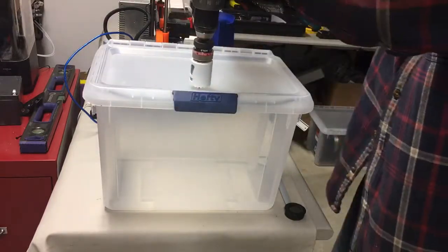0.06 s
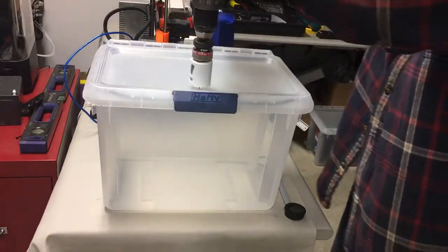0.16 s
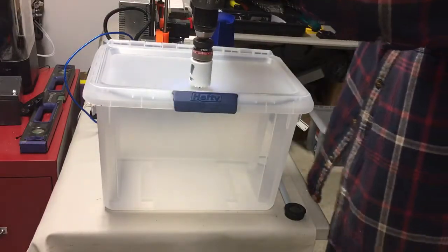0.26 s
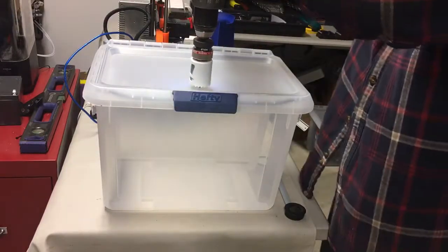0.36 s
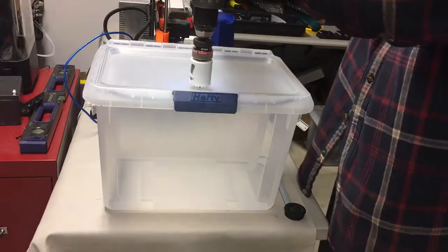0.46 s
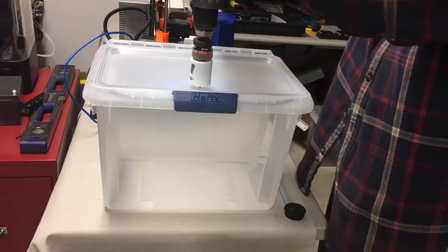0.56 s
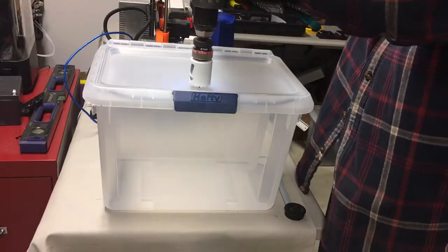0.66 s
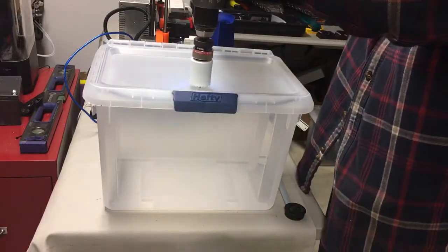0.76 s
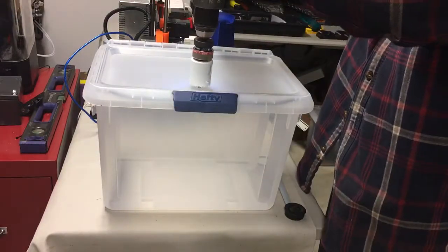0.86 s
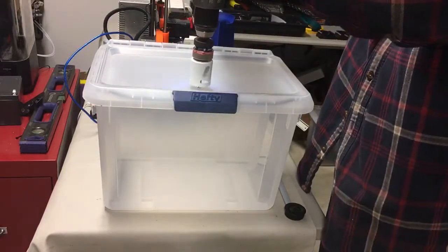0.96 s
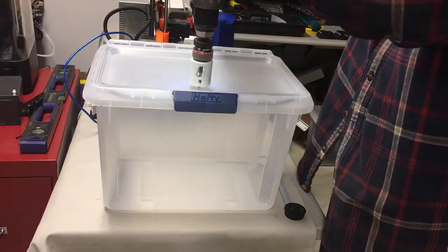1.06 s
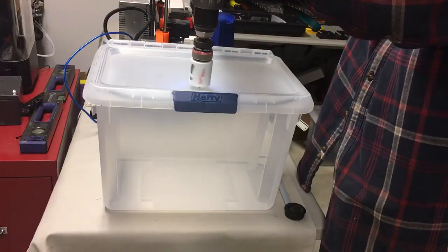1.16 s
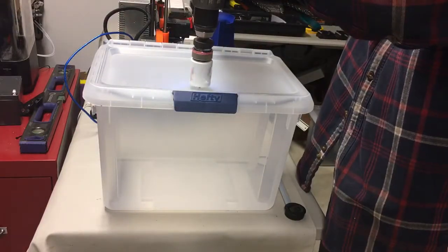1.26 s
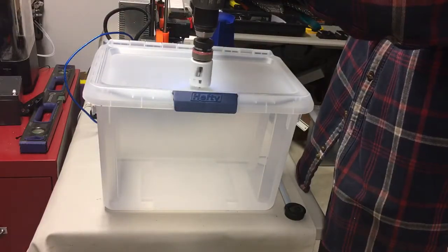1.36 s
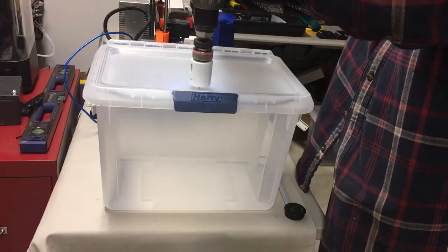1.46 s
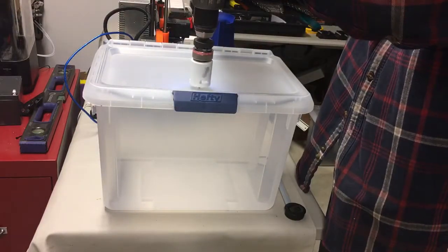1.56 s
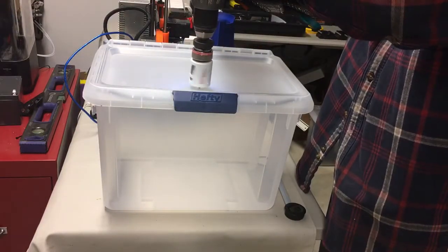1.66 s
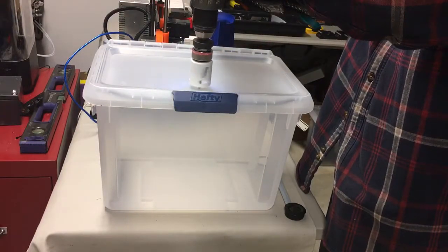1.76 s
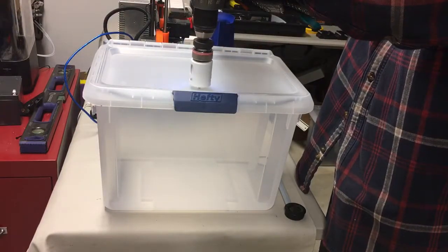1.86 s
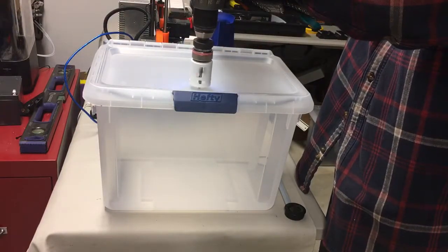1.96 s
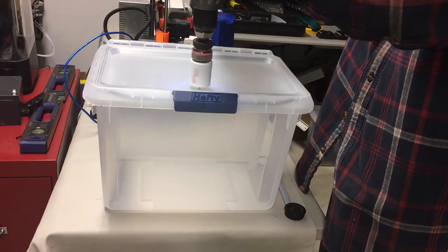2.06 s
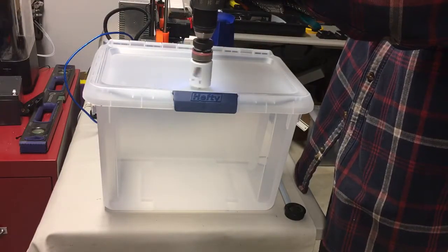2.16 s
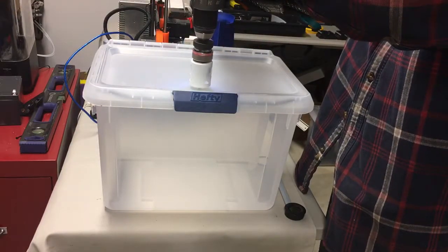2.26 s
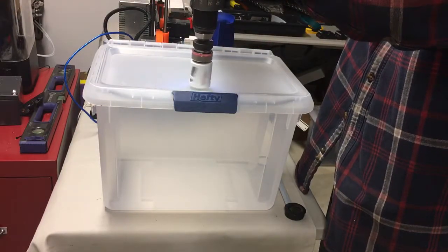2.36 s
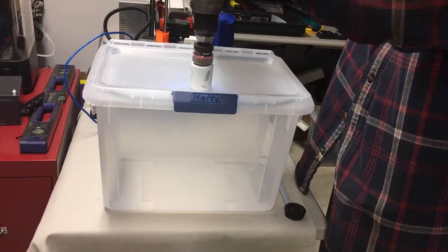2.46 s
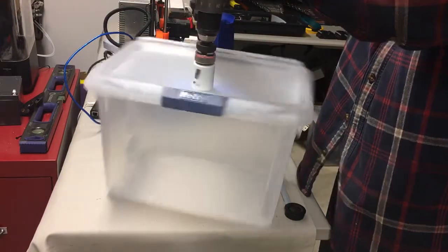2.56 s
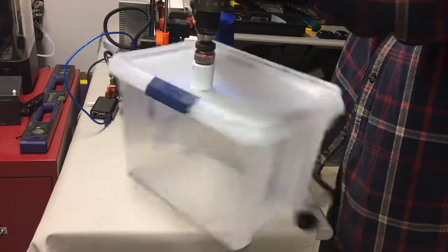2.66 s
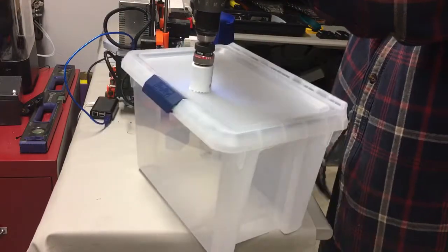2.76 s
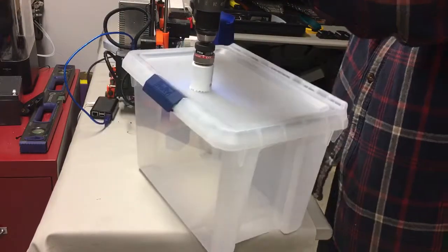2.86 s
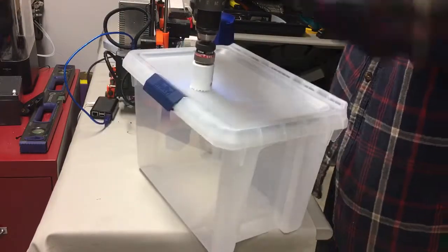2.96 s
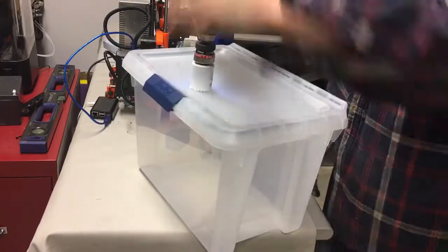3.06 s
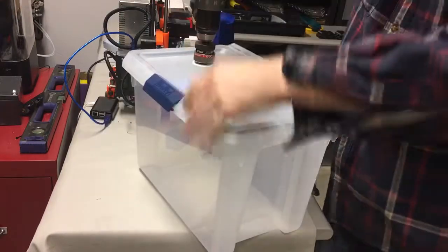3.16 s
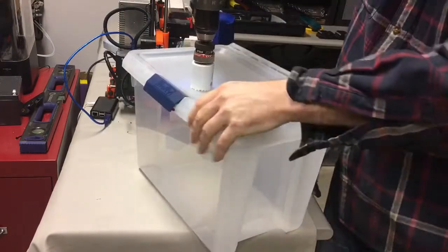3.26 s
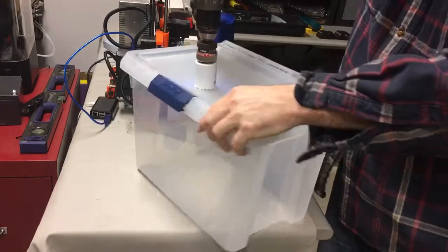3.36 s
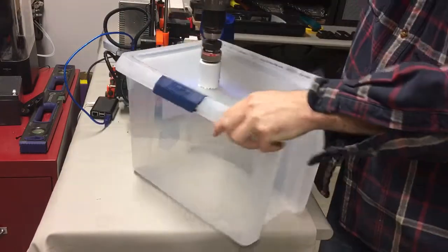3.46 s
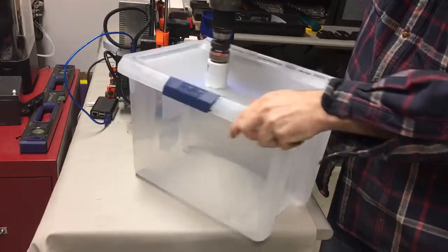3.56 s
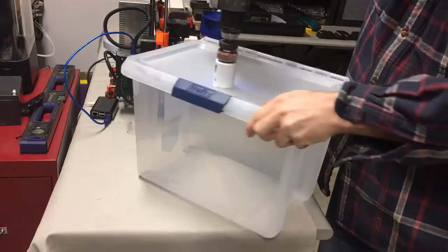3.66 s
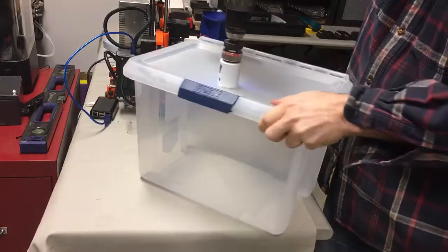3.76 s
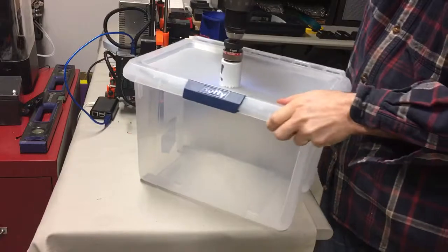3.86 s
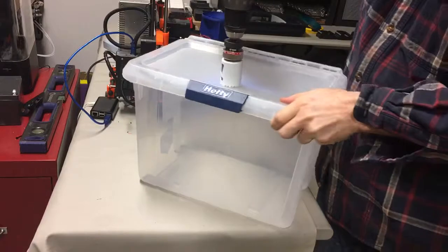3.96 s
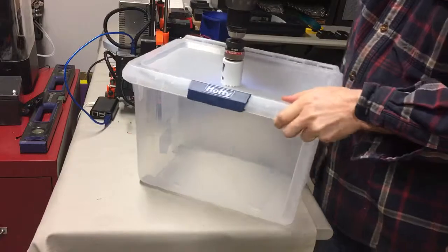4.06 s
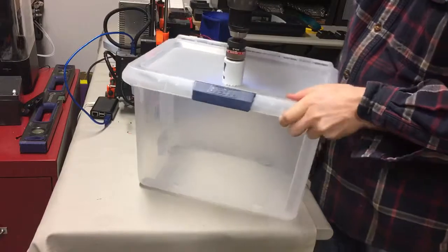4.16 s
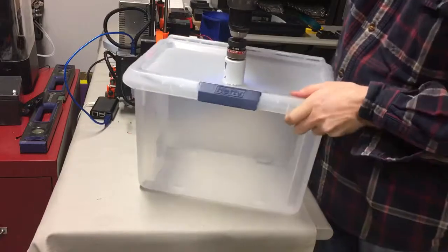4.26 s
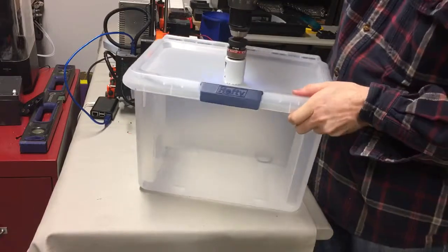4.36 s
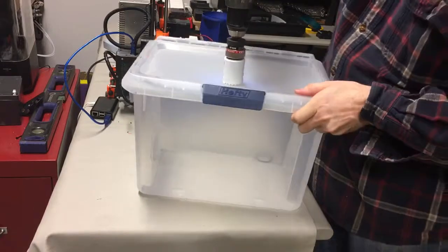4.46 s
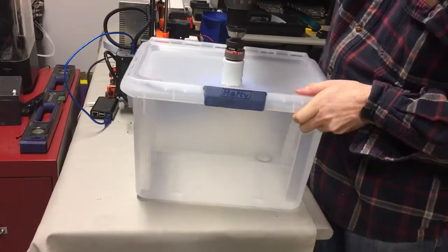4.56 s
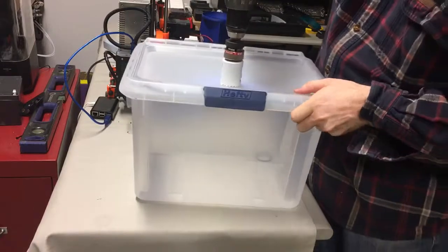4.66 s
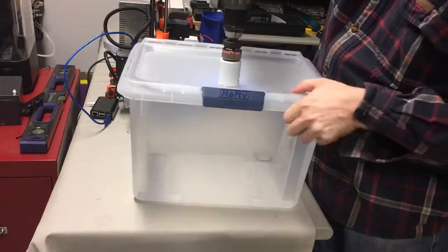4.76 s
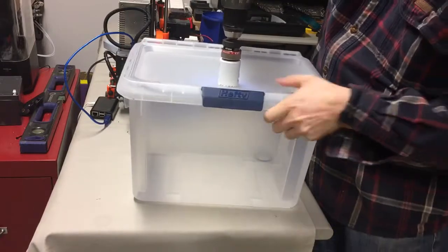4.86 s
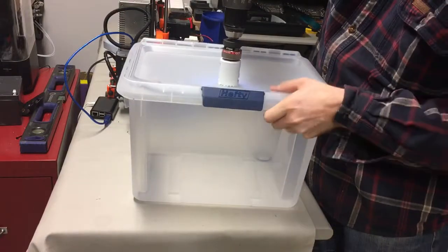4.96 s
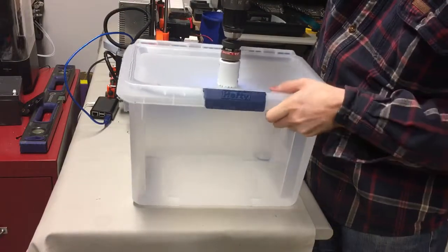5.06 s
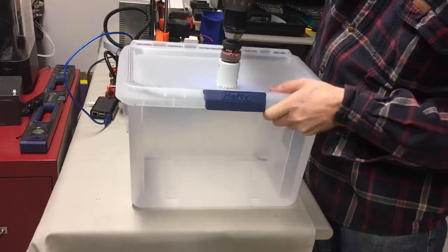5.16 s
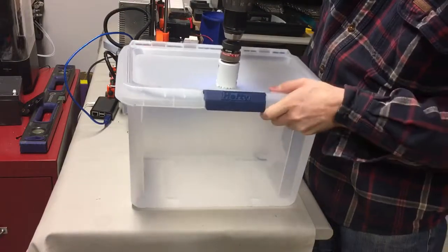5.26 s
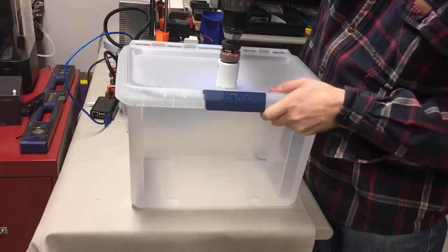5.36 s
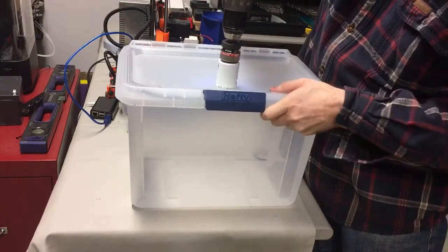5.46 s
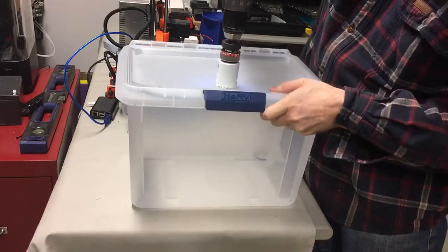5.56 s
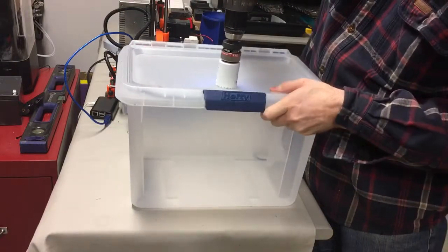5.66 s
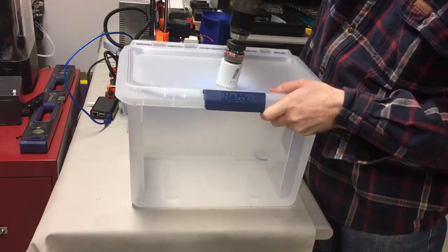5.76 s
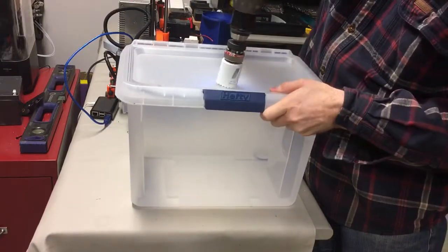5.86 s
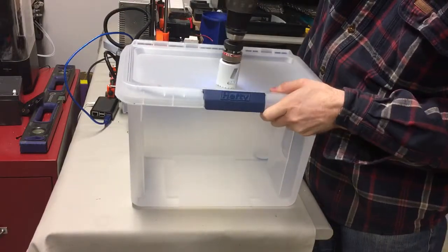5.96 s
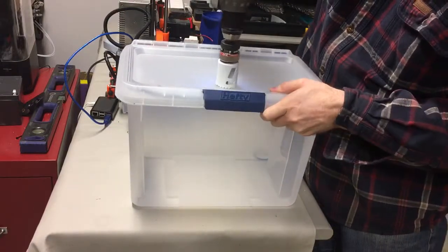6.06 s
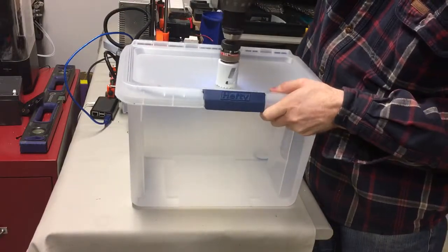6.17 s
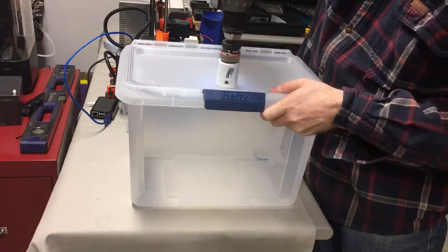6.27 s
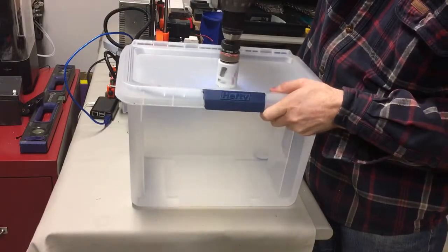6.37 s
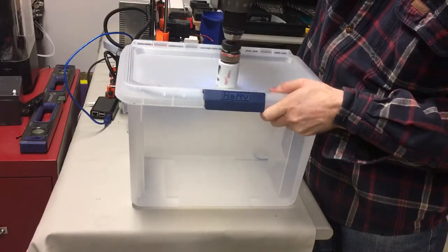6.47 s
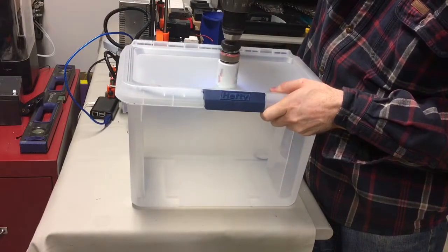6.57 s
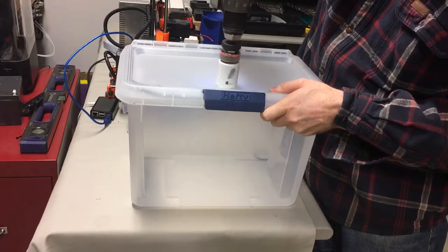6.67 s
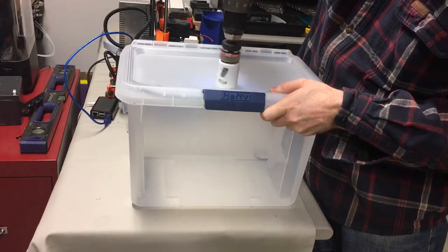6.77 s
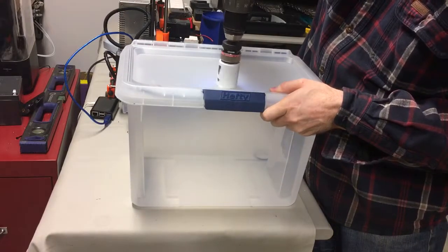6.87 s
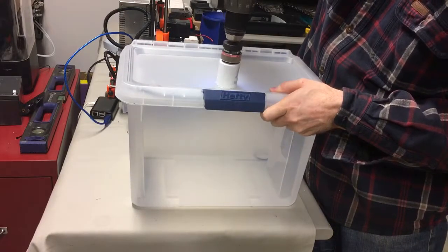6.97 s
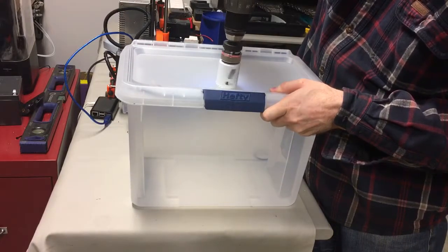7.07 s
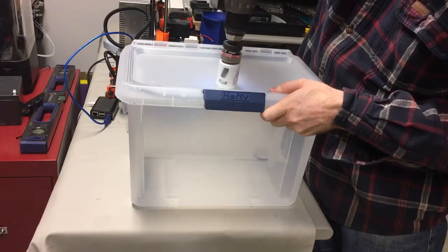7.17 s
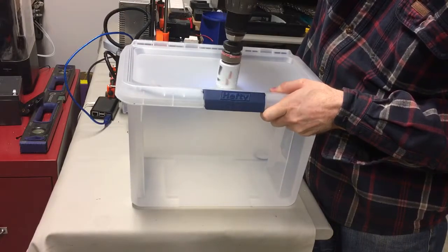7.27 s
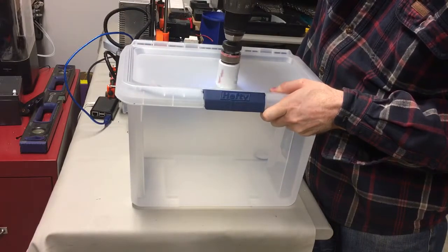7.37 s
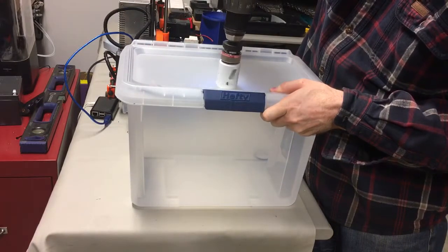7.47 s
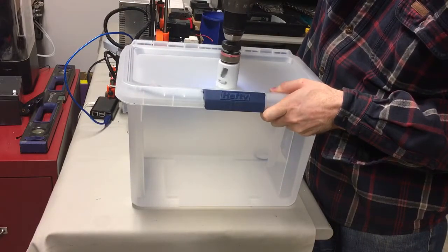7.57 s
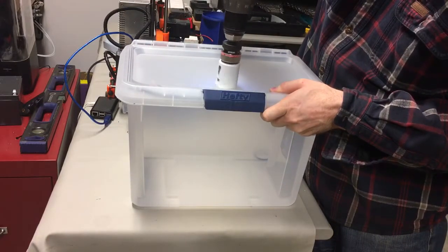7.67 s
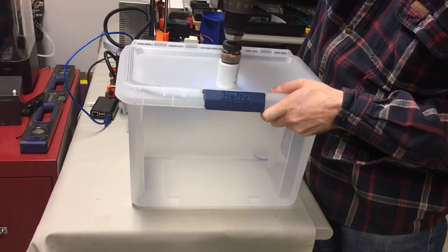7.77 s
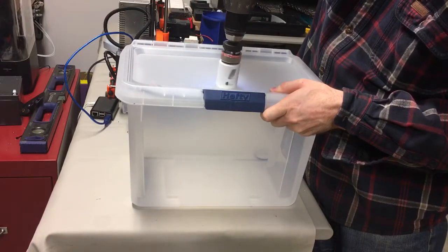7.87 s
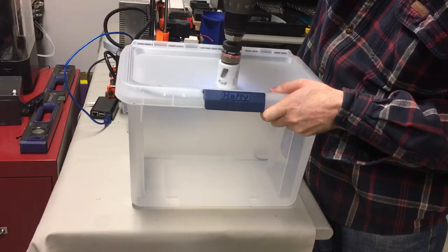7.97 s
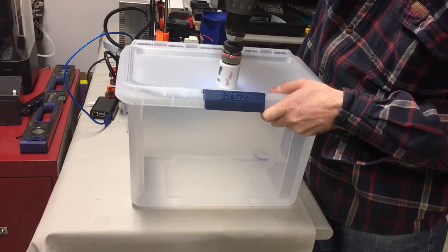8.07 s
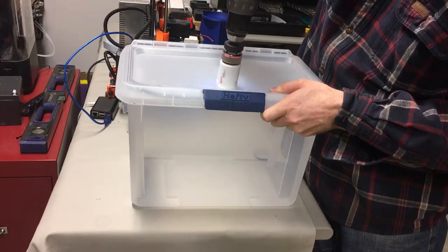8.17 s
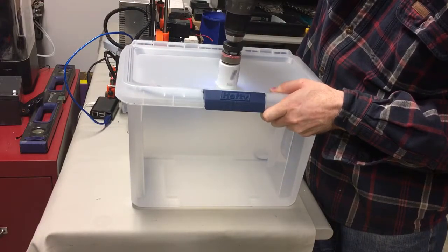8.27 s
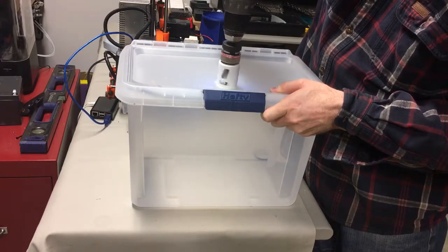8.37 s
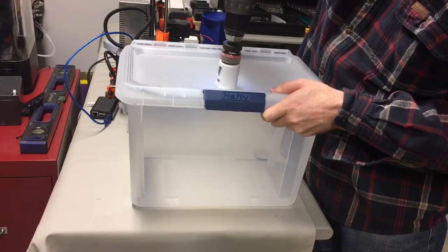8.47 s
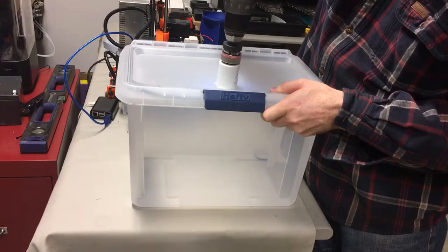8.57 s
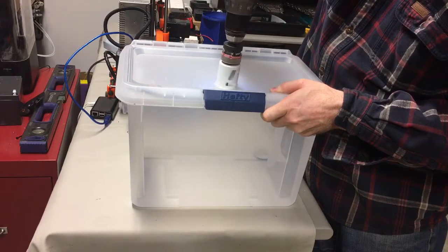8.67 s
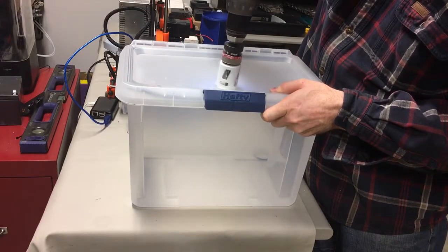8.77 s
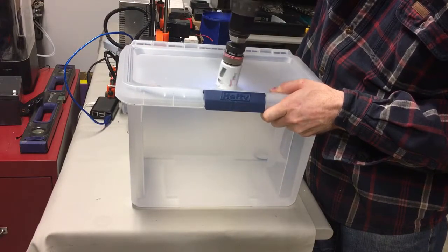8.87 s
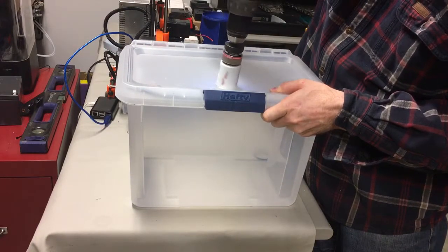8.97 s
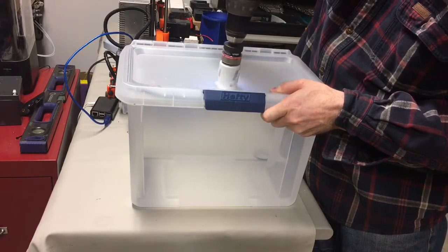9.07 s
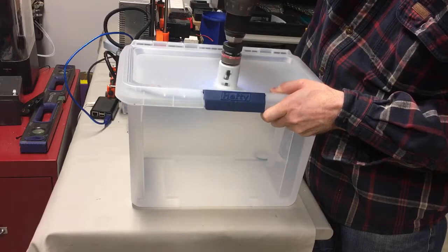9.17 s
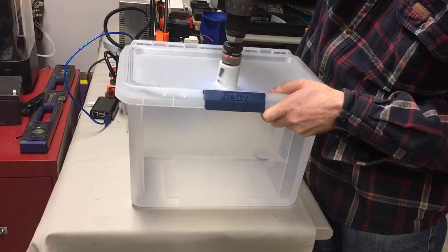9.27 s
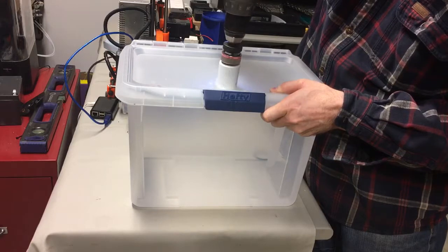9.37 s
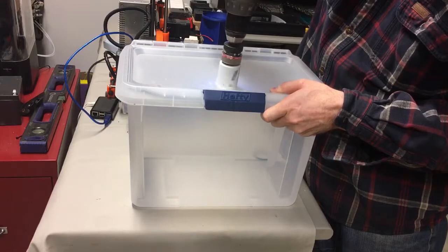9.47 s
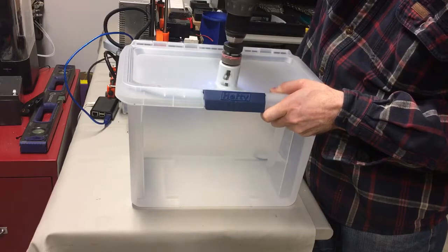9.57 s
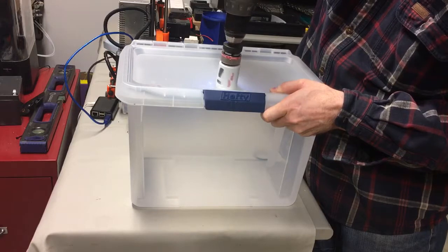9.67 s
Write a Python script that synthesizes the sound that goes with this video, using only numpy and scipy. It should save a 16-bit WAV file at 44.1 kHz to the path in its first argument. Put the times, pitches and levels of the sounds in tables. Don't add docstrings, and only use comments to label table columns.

```python
import sys
import numpy as np
from scipy import signal
from scipy.fft import rfft, irfft, next_fast_len
from scipy.io import wavfile
from scipy.ndimage import map_coordinates

SR = 44100
rng = np.random.default_rng(int(sys.argv[2]) if len(sys.argv) > 2 else 0)


def volts(x):
    e = np.asarray(x, float) / 20
    return 10 ** e


def bounce(signal):
    frames = np.transpose(np.atleast_2d(signal))
    limited = np.clip(frames, -1, 1)
    pcm = np.round(limited * 32767).astype(np.int16)
    wavfile.write(sys.argv[1], SR, pcm)


N = 429093
STEP = 32

# freq_hz [Hz], density_db [dB per Hz]
FLOOR_SPECTRUM = [(18, -48.5), (30, -3), (79, -4.5), (103, -17.5), (145, -11), (170, -34), (461, -47),
                  (10500, -47), (14400, -46), (16000, -58)]
# freq_hz [Hz], t60_s [s]
SHOP_DECAY = [(150, 1), (1000, 0.47), (4000, 0.57), (9000, 0.42), (15000, 0.16)]
# freq_hz [Hz], density_db [dB per Hz]
CLOTH = [(1060, -13), (1800, 0.5), (3380, 2.5), (4880, -4), (5490, -0.5), (6020, -2), (13200, -14.5),
         (16000, -21.5)]
GEARS = [(1060, -53), (1800, -18.5), (2350, -11.5), (2690, 5.5), (2920, 2.5), (4920, -7), (5960, 6),
         (7160, -7.5), (10600, -10.5), (11300, -14.5), (16000, -24)]
SAW = [(1060, -38), (1800, -28), (2720, 4.5), (4880, -4), (6240, 1), (7490, -9.5), (9080, -7), (9860, -9.5),
       (10500, -15.5), (12200, -12), (16000, -23)]
DULL = [(1060, -30), (1800, 0.5), (5250, -2), (7630, -12), (9770, -14), (16000, -34)]
# freq_hz [Hz], density_db [dB per Hz]
TEETH = [(240, -10), (400, -6), (800, -0.5), (950, -1.5), (1030, 5), (1120, 3), (1300, 2.5), (1900, 1),
         (2600, -2), (3400, -6), (5700, -120)]
WALLS = [(240, -46), (400, -18), (569, -2.5), (754, -9.5), (1240, -6.5), (1870, -15.5), (2600, -18),
         (3380, -40), (5720, -120)]
# centre_hz [Hz], width_hz [Hz], level_db [dB]
LID = [(129.7, 36, -6), (163.5, 10.7, 1.5), (196, 11.3, 2), (255, 16.3, 4.5), (341.3, 29, -0.5),
       (445.6, 77, -8)]
# peak_s [s], level_db [dB], fall_s [s per 10 dB], scrape_db [dB], drumming_db [dB]
JOLTS = [
    (0.0, -60, .05, -12, -2.2),
    (.13, -60, .11, -16, -12),
    (.2, -77, .7, -3, 4),
    (3.918, -48.5, .15, 6, -12),
    (3.914, -62, .055, 3, 32),
]
# peak_s [s], level_db [dB], fall_s [s per 10 dB], scrape_db [dB], drumming_db [dB]
STROKES = [(3.76, -54, .2, -3, -12), (3.55, -72, .06, 1.5, 20), (3.86, -60, .04, -10, -3),
           (4.285, -50, .115, -9, -2.5), (4.55, -49.5, .125, -8, .5), (4.7, -62, .08, -2.5, -6),
           (4.82, -63, .09, 7, 3), (4.975, -72, .055, 12, 22), (5.155, -54, .1, -11, .5),
           (5.3, -64, .06, 1.5, 7), (5.47, -78, .3, 3, 8)]
# start_s [s], peak_db [dB], bright_db [dB], boom_db [dB]
KNOCKS = [(2.658, -18, -15, -19), (2.744, -11.5, -1, -19), (3.157, -22, -30, -12), (3.848, -43, -11, -20),
          (3.907, -16, -17, -6), (4.511, -42, 11, -15), (4.795, -37.5, -29, -4), (4.83, -37, -19, -2.5),
          (4.923, -56, -23, -1), (4.943, -46, -21, 12.5), (4.97, -39.5, -24, 6), (5.029, -49, -20, -16),
          (5.482, -51.5, -5, -9)]
# start_s [s], peak_db [dB], low_db [dB]
TICKS = [
    (5.9344, -43.5, -9),
    (6.0194, -53, 11),
    (6.0721, -33.5, -5),
    (6.103, -38.5, 2),
    (6.1414, -49, -11),
]
# start_s [s], peak_db [dB], low_db [dB], ring_db [dB]
BOUNCES = [(3.156, -7.5, 9, -20), (3.1727, 15, -19, -2.5), (3.1776, 0, -30, -4), (3.188, -7.5, -28.5, -24),
           (3.2119, -2, -2.5, -9.5), (3.2996, -12, -18, -8.5), (3.3208, -15, -5.5, -10.5),
           (3.364, -4, -8.5, -5), (3.3861, -17, -2, -16), (3.4842, -3, -10, -6.5), (3.5632, -9.5, -17, -2),
           (3.5906, -32, -22, -7)]
# centre_hz [Hz], width_hz [Hz], level_db [dB]
STEEL = [(1230, 180, -18), (2450, 80, 14), (3130, 330, -5), (4300, 127, -23), (5600, 150, -.5),
         (8430, 490, -3), (9540, 330, -10.5), (13000, 900, -3.5)]
# centre_hz [Hz], width_hz [Hz], level_db [dB]
RIM = [(1740, 990, -12), (3090, 440, 1.5), (7500, 1820, -2), (9630, 300, -3), (13100, 590, 3.5)]
TIPS_AT_S = 3.25
# peak_s [s], level_db [dB], rise_s [s per 10 dB], fall_s [s per 10 dB]
ROLL = [
    (3.322, -31.5, .06, .17),
    (3.422, -31.5, .08, .1),
    (3.2, -44, .025, .28),
]
# on_s [s], off_s [s], upper_db [dB], lower_db [dB] of the switching lines, hum_db [dB]
RUNS = [
    (.697, 2.665, -43, -43, -57.5),
    (5.703, 5.862, -40.5, -38.5, -59),
    (6.252, 9.9, -41.5, -41.5, -55.5),
]
# start_s [s], gained_hz [commutation Hz], lag_s [s]
SQUEEZES = [
    (.698, 179.7, .018),
    (1.087, 200.8, .036),
    (1.611, 196.5, .046),
    (2.53, -90, .009),
    (5.69, 372.7, .016),
    (6.235, 121, .025),
    (6.347, 139.2, .013),
]
# centre_s [s], lost_hz [commutation
# Hz], width_s [s]
SAGS = [(2.24, 9.3, .059), (2.93, 46, .438), (5.875, 48, .042), (6.68, 6, .12), (7.356, 19.1, .248),
        (7.556, 7.5, .047), (7.896, 22.2, .16), (8.233, 41.4, .134), (8.909, 53, .148),
        (9.111, 19.7, .146), (9.323, 14, .086), (9.602, 16.9, .197)]
# whirr_db [dB], scrape_db [dB], drumming_db [dB]
CRUISE_NOISE = [
    (-44, -59, -63),
    (-40, -42, -42),
    (-40.5, -44, -44.5),
]
# time_s [s], whirr_db [dB], scrape_db [dB], drumming_db [dB]
GRAB = [
    (2.52, -27.5, -14, -13.5),
    (2.65, -30, -8, -10),
    (2.67, -31, .6, -3),
    (2.74, -40.5, 10, 9.5),
]
# peak_s [s], level_db [dB], fall_s [s per 10 dB], scrape_db [dB], drumming_db [dB]
SPIN_TAIL = [
    (2.74, -40, .1, 9.5, 6),
    (2.75, -58, .5, 8, 3),
]
# peak_s [s], level_db [dB], fall_s [s per 10 dB], scrape_db [dB], drumming_db [dB]
START_TAIL = [
    (5.872, -44, .13, -1.1, .5),
]
# centre_hz [Hz], width_hz [Hz], level_db [dB]
GEAR_CASE = [(520, 120, -9), (1030, 60, 8), (2950, 420, -.5), (5400, 250, -6)]
# start_s [s], level_db [dB]
CHIRPS = [
    (.695, -55),
    (5.7, -55),
    (6.256, -54),
]
# freq_hz [Hz], gain_db [dB]
HOUSING = [(150, -10.5), (500, -13), (900, -6.5), (1030, -3.5), (1200, -5), (1700, -6), (2300, -4.5),
           (2800, 3), (3400, -4.5), (4400, -15), (5200, -2.5), (6300, -5.5), (9000, -25.5)]
# commutation_hz [Hz], gain_db [dB]
UPPER = [(40, -5), (160, -3), (215, -7), (255, -.1), (320, .6), (380, -6), (525, 1.1), (556, -5)]
LOWER = [(80, -18), (130, -11), (160, -17), (180, -3), (235, -8), (260, -.1), (500, -2.2), (556, -14)]
SIDE_ORDERS = [0, -2, 2, -4, 4, -5, 5, 7]
SIDE_DB = [-31, -13.5, -42, -26, -25.5, -16, -26.5, -23]
HUM_ORDERS = [1, 2, 3, 4, 5, 6, 7, 8, 11, 14, 17, 20, 2.812, 5.624, 8.436, 14.06, 16.87]
FREE_ORDER_DB = [-2, 4, -.5, -1.5, 3, -24.5, -1, 4.5, -5.5, -14, -4, -3, -7, -6.5, -6, -9.5, -15]
BITE_ORDER_DB = [-16, 0, -2.5, -4, 2.5, -1.5, -4, -8, 3, -1.5, 3.5, -1.5, -12.5, 1.5, .5, -.5, 1.5]
# time_s [s], load [0-1]
BITE = [
    (2.51, 0),
    (2.54, 1),
]

SWITCH_HZ = 9729.5
CRUISE_HZ = 250
SUDDEN, GENTLE = .07, .8


def unit(x):
    return x / np.sqrt(np.mean(x ** 2) + 1e-20)


def along(points, hz):
    f, v = np.transpose(points)
    return np.interp(np.log(hz + 1), np.log(f + 1), v)


def curves(rows):
    s, *cols = np.transpose(rows)
    t = np.arange(N) / SR
    return [np.interp(t, s, cols[0], -120, -120)] + [np.interp(t, s, c) for c in cols[1:]]


def fine(control):
    return np.interp(np.arange(N) / STEP, np.arange(len(control)), control)


def wobble(rate):
    knots = rng.standard_normal(int(N * rate / SR) + 4)
    return fine(map_coordinates(knots, [np.arange(0, N, STEP) * rate / SR]))


def filtered(x, response):
    m = next_fast_len(N + SR // 2)
    return irfft(rfft(x, m) * response(np.fft.rfftfreq(m, 1 / SR)), m)[:N]


def resonances(modes):
    def response(f):
        total = 0
        for k, (centre, width, db) in enumerate(modes):
            damping = 1j * f * width
            total = total + (-1) ** k * volts(db) * damping / (centre * centre - f * f + damping)
        return total
    return response


def tent(s, db, rise, fall, order=1):
    t = np.arange(0, N, STEP) / SR - s
    return db - 10 * np.where(t > 0, t / fall, -t / rise) ** order


def swells(rows, rise, order=1):
    gains = 0
    for s, db, fall, scrape_db, drum_db in rows:
        shares = volts([[0], [scrape_db], [drum_db]])
        gains = gains + volts(tent(s, db, rise * fall, fall, order)) * shares
    return np.array([fine(g) for g in gains])


def grit(rough_db, rate):
    return rng.standard_normal(N) * volts(rough_db * wobble(rate))


def rubbing(gains, spectrum, plastic, source):
    high = unit(filtered(source, lambda hz: volts(along(spectrum, hz))))
    scrape = unit(filtered(grit(rough_db=0, rate=90), lambda hz: volts(along(plastic, hz))))
    return np.array([volts(-1.0) * gains[0] * high + gains[1] * scrape, gains[2]])


def crack(t, low_db, high_db, band_hz, fast, slow):
    def push():
        return rng.standard_normal(len(t)) + 4 * (t == 0)
    low = signal.lfilter(*signal.butter(2, band_hz, "band", fs=SR), push()) * volts(-60 * t / slow)
    high = signal.lfilter(*signal.butter(2, band_hz[1], "high", fs=SR), push()) * volts(-60 * t / fast)
    return volts(high_db) * high / abs(high).max() + volts(low_db) * low / abs(low).max()


def background():
    colour = filtered(rng.standard_normal(N), lambda hz: volts(along(FLOOR_SPECTRUM, hz)))
    return volts(-59 + 1.5 * wobble(6)) * unit(colour)


def shop(x):
    hz, t, z = signal.stft(rng.standard_normal(SR), SR, nperseg=256)
    decay = volts(-60 * t / along(SHOP_DECAY, hz)[:, None])
    tail = signal.istft(z * decay, SR, nperseg=256)[1]
    return signal.fftconvolve(np.pad(x, (260, 0)), tail / np.linalg.norm(tail))[:N]


def drumming():
    return unit(filtered(grit(rough_db=3, rate=40), resonances(LID)))


def hands():
    gains = swells(JOLTS, SUDDEN) + swells(STROKES, GENTLE, order=1.5)
    return rubbing(gains, CLOTH, WALLS, grit(rough_db=2.0, rate=38))


def tub():
    out, blows, t = np.zeros(N), np.zeros(N), np.arange(SR // 8) / SR
    for s, db, high_db, boom_db in KNOCKS:
        at = round(s * SR)
        knock = crack(t, 0, high_db - 8, (450, 1700), fast=0.0098, slow=0.031)
        out[at:][:len(t)] += volts(db + 1.0) * knock
        blows[at] = volts(db + boom_db + 34.5)
    for s, db, low_db in TICKS:
        tick = crack(t, low_db, 0, (700, 3000), fast=0.0105, slow=0.015)
        out[round(s * SR):][:len(t)] += volts(db) * tick
    return out + filtered(blows, resonances(LID))


def cap():
    out, blows, t = np.zeros(N), np.zeros((2, N)), np.arange(SR // 10) / SR
    for s, db, low_db, ring_db in BOUNCES:
        at = round(s * SR)
        blow = volts(db - 5) * crack(t, low_db, 0, (700, 5000), fast=0.0089, slow=0.0093)
        out[at:][:len(t)] += blow
        blows[int(s > TIPS_AT_S), at:][:len(t)] += volts(ring_db + 13) * blow
    steel = out + filtered(blows[0], resonances(STEEL)) + filtered(blows[1], resonances(RIM))

    def modes(part):
        return unit(filtered(grit(rough_db=3.0, rate=150), lambda f: abs(resonances(part)(f)) ** 0.8))
    low, high, deep = (fine(volts(tent(*row))) for row in ROLL)
    rumble = filtered(grit(rough_db=5, rate=40), lambda f: resonances(LID)(f) + volts(along(WALLS, f) - 9))
    rattle = low * modes(RIM[:2]) + high * modes(RIM[2:]) + deep * unit(rumble)
    return steel, volts(-2.5) * rattle


def trigger():
    t, hz = np.arange(N) / SR, np.zeros(N)
    quick, creep_s = .818, .491
    for s, gain_hz, lag in SQUEEZES:
        d = np.maximum(t - s, 0)
        rest = min(off for _, off, *_ in RUNS if off > s) + .1
        missing = quick * (1 + d / lag) * np.exp(-d / lag) + (1 - quick) * np.exp(-d / creep_s)
        hz += gain_hz * (1 - missing) * (t < rest)
    sag = sum(lost_hz * np.exp(-((t - s) / width) ** 2) for s, lost_hz, width in SAGS)
    gates = []
    for on, off, *_ in RUNS:
        attack = 1 - np.exp(-np.maximum(t - on, 0) / .011)
        release = np.exp(-np.maximum(t - off, 0) / .012)
        gates.append(attack * release)
    return np.maximum(hz - sag, 10), sag, np.array(gates)


def drill_noise(turn, speed, sag, gates):
    t, beat = np.arange(N) / SR, 1 + 0.17 * np.cos(turn)
    effort = np.maximum(speed + .04 * SR * np.gradient(speed), 10)
    law = volts(7 * np.log2(effort / CRUISE_HZ))
    idle, start, cut = volts(CRUISE_NOISE)[..., None] * (gates * law)[:, None]
    press = volts(np.outer((6, 18, 18), np.clip(t - 2.2, 0, 1)))
    idle = idle * press * (t < GRAB[0][0])
    cut[0] *= volts(.11 * sag)
    free = rubbing(idle, GEARS, TEETH, beat * grit(rough_db=1.0, rate=100))
    whirr_db, scrape_db, drum_db = curves(GRAB)
    grab_gains = volts(whirr_db + [0 * t, scrape_db, drum_db])
    grab = rubbing(grab_gains, GEARS, WALLS, grit(rough_db=-0.5, rate=130))
    tails = rubbing(swells(SPIN_TAIL, SUDDEN), DULL, WALLS, grit(rough_db=1.0, rate=60))
    tails += rubbing(swells(START_TAIL, SUDDEN), DULL, TEETH, grit(rough_db=0.5, rate=72))
    strain = volts(-35.5) * gates[1] + volts(-54 + .24 * sag) * gates[2] * law
    tails[0] += strain * unit(filtered(grit(rough_db=3, rate=60), resonances(GEAR_CASE)))
    sawing = rubbing(start + cut, SAW, TEETH, beat * grit(rough_db=0.5, rate=120))
    return free + grab + tails + sawing


def start_chirps():
    chirps, t = np.zeros(N), np.arange(1300) / SR
    pair = np.sin(np.pi * SWITCH_HZ * t) + 0.78 * np.sin(3 * np.pi * SWITCH_HZ * t)
    for s, db in CHIRPS:
        chirps[round(s * SR):][:len(t)] = volts(db) * pair * np.sin(np.pi * t / t[-1]) ** .4
    return chirps


def motor_hum(hz, turn, speed, sag):
    load = np.interp(np.arange(N) / SR, *np.transpose(BITE))
    rough = .2 + .8 * load
    hum = np.zeros(N)
    for k, free_db, bite_db in zip(HUM_ORDERS, FREE_ORDER_DB, BITE_ORDER_DB):
        db = free_db + load * (bite_db - free_db)
        level = db[::STEP] + along(HOUSING, k * hz[::STEP]) + 2.65 * wobble(25)[::STEP]
        hum += fine(volts(level)) * np.sin(k * turn + rough * wobble(90))
    hum *= volts(11.5 * np.log2(speed / CRUISE_HZ) + 5 * load + .14 * sag)
    return hum * volts(-.003 * SR * abs(np.gradient(speed)))


def motor(speed, sag, gates):
    upper, lower, drone = volts(np.transpose(RUNS)[2:]) @ gates
    upper = upper * volts(along(UPPER, speed))
    lower = lower * volts(along(LOWER, speed))
    hz = speed * (1 + .006 * wobble(40))
    turn = 2 * np.pi * np.cumsum(hz) / SR
    carrier = 2 * np.pi * SWITCH_HZ * np.arange(N) / SR + 0.15 * wobble(60)
    whine = upper * volts(wobble(10)) * np.sin(carrier + turn)
    whine += lower * volts(2.0 * wobble(6)) * np.sin(carrier - turn)
    for k, db in zip(SIDE_ORDERS, SIDE_DB):
        whine += upper * volts(db + 1.1 * wobble(6.1)) * np.sin(carrier + k * turn)
    hum = drone * motor_hum(hz, turn, speed, sag)
    return np.sqrt(2) * (whine + hum) + start_chirps(), turn


def scene():
    drive = trigger()
    tones, turn = motor(*drive)
    steel, rattle = cap()
    knocks = tub()
    rub, drums = drill_noise(turn, *drive) + hands()
    wet = volts(-9.5) * shop(tones) + volts(-3.5) * shop(steel) + volts(-8.5) * shop(knocks)
    mix = tones + steel + rattle + knocks + wet + rub + drums * drumming() + background()
    return np.tile(mix, (2, 1))


def low_pass(x):
    return signal.sosfilt(signal.butter(12, 17160, fs=SR, output="sos"), x)


def record(dry):
    soft = dry[0] / (1 + abs(dry[0] / .62) ** 4) ** (1 / 4)

    def band(hz):
        top = np.clip((16000 - hz) / 250, 0, 1)
        return top / np.sqrt(1 + (46 / (hz + 1)) ** 8)
    heard = filtered(soft, band)
    return low_pass(np.tile(heard, (2, 1)))


dry = scene()
out = record(dry)
bounce(out)
```